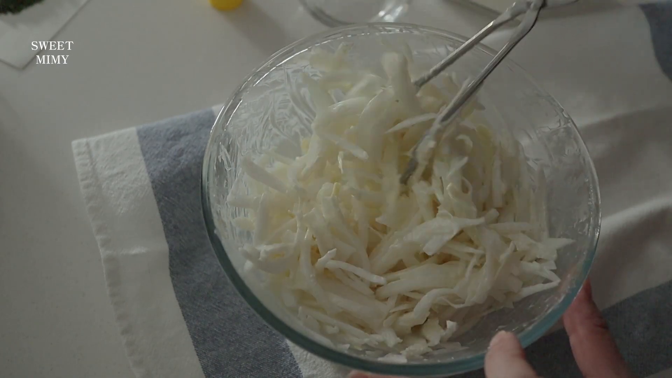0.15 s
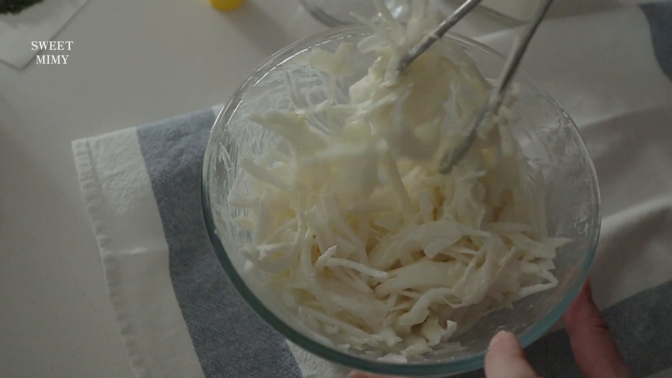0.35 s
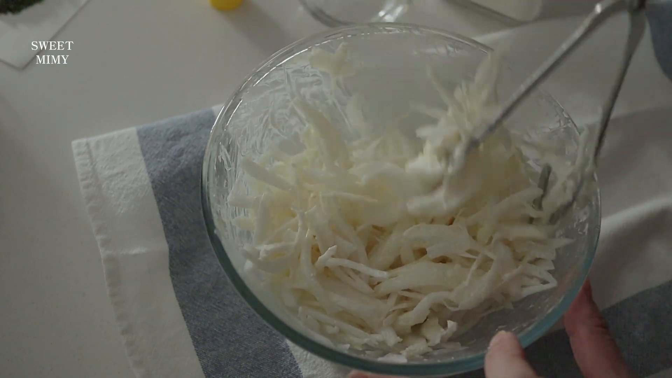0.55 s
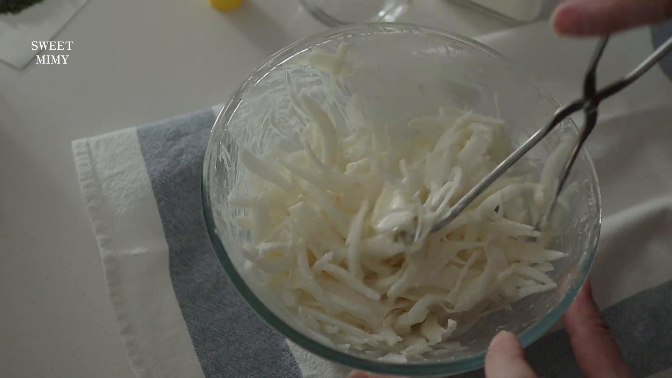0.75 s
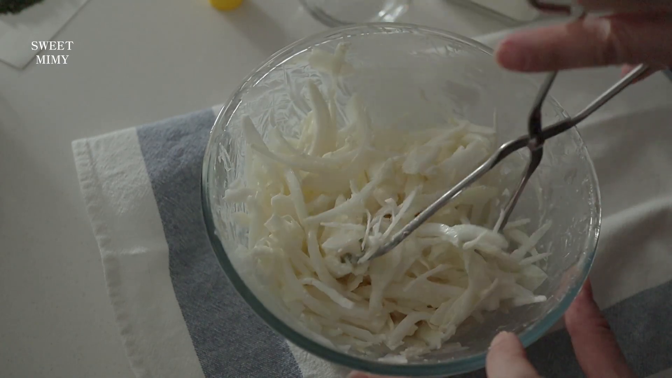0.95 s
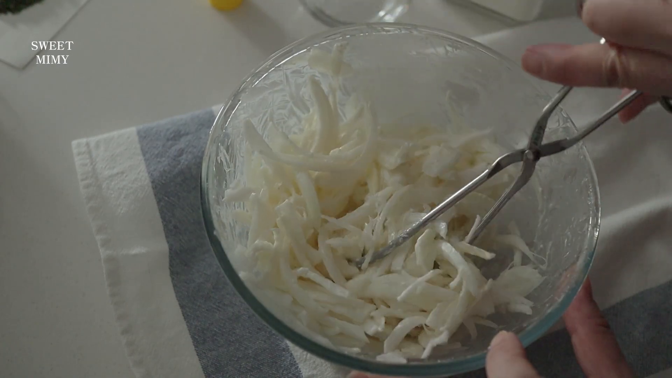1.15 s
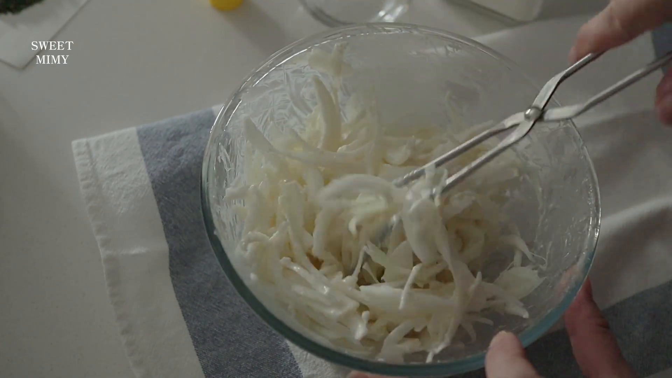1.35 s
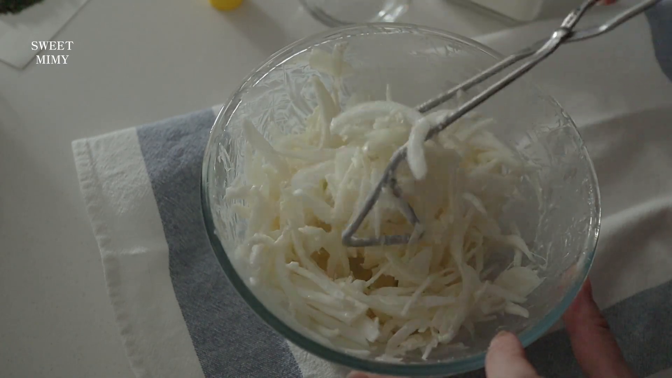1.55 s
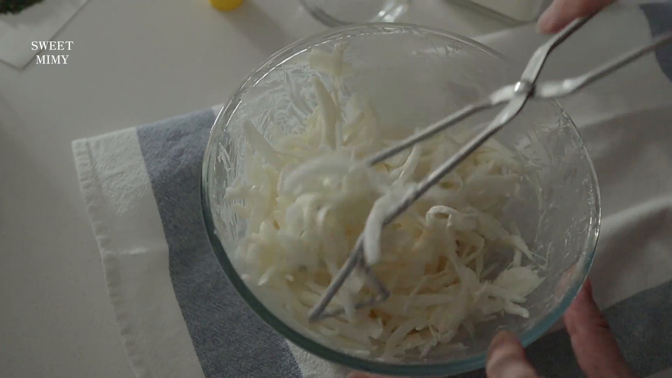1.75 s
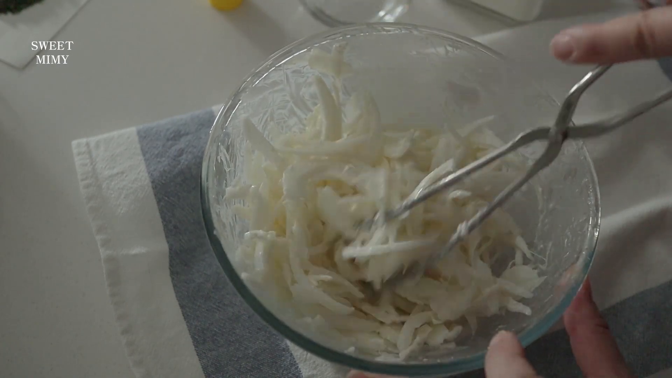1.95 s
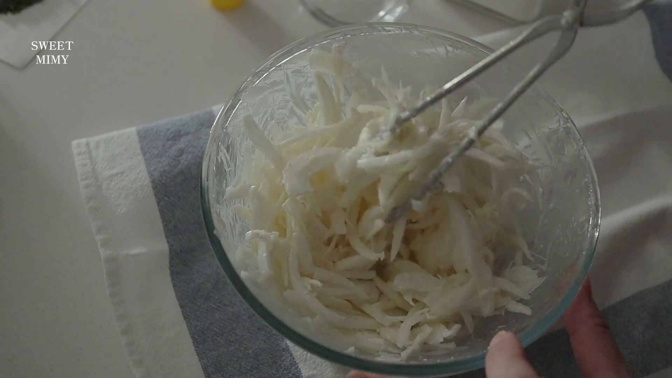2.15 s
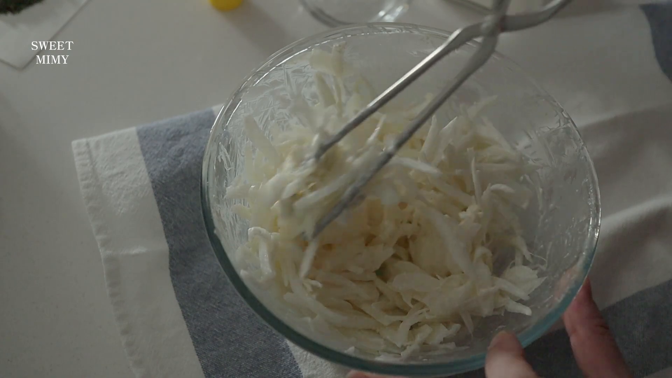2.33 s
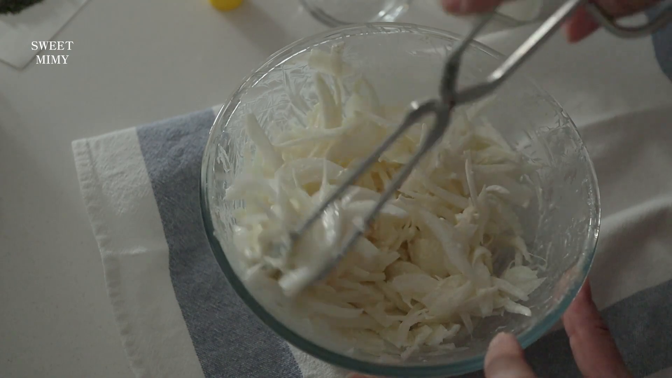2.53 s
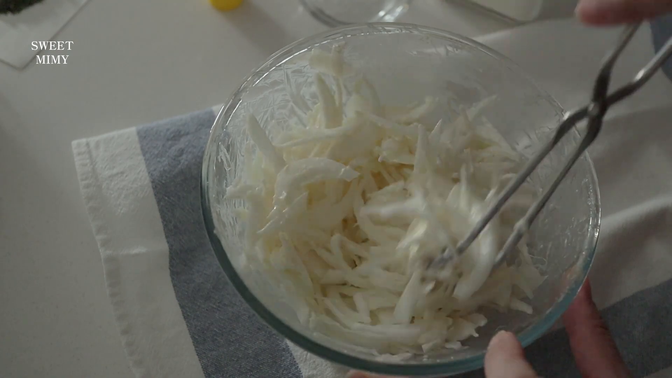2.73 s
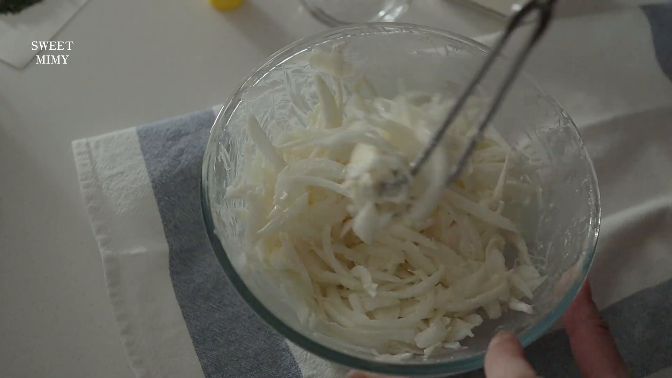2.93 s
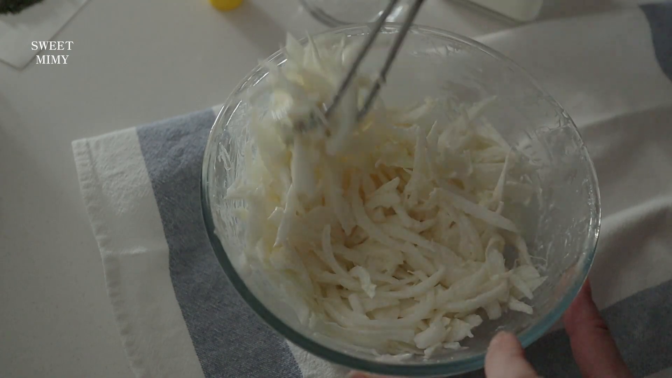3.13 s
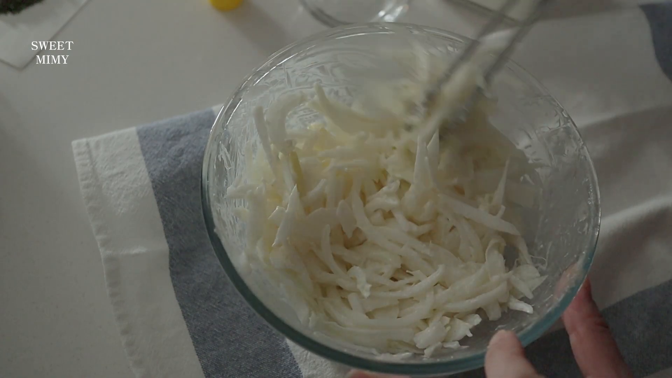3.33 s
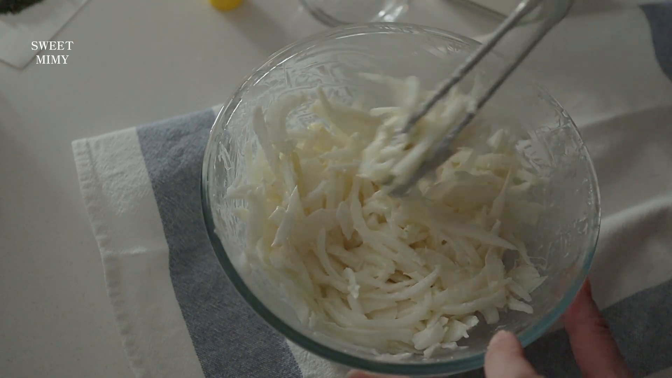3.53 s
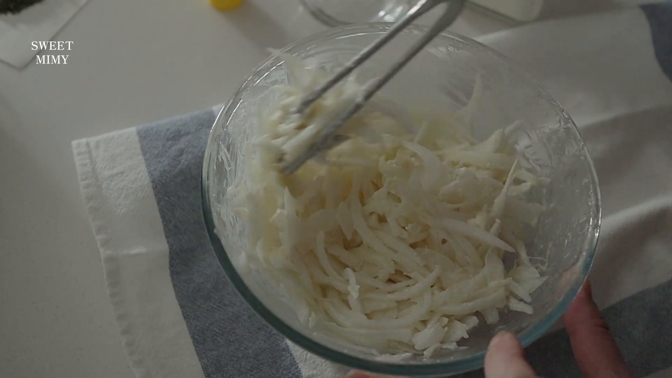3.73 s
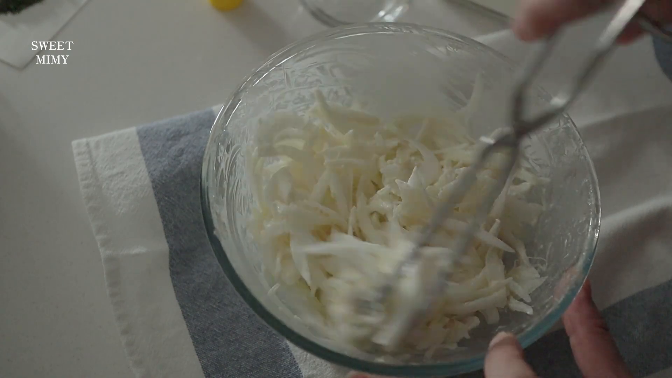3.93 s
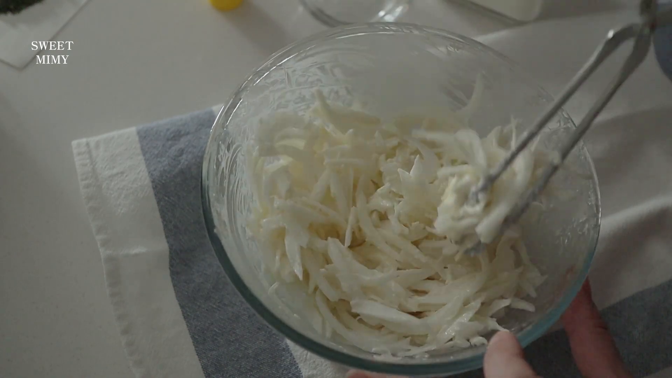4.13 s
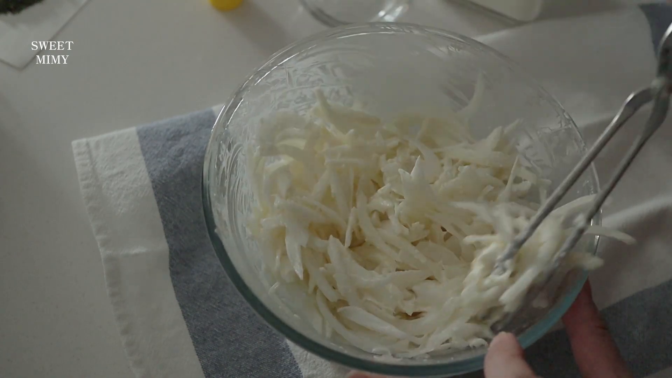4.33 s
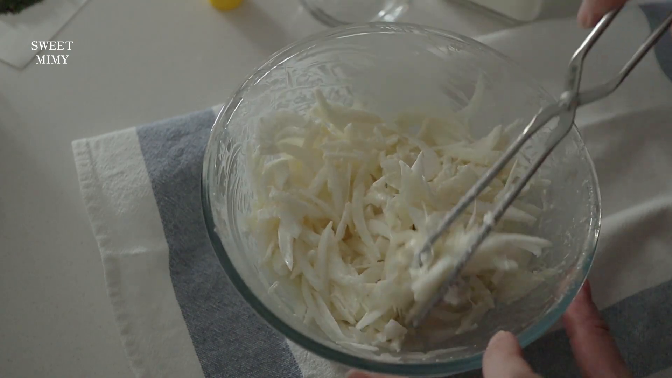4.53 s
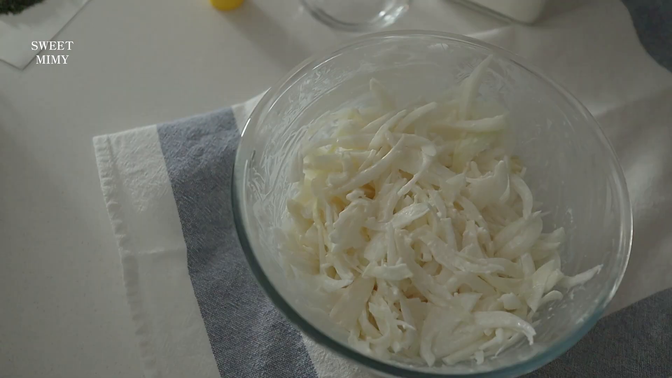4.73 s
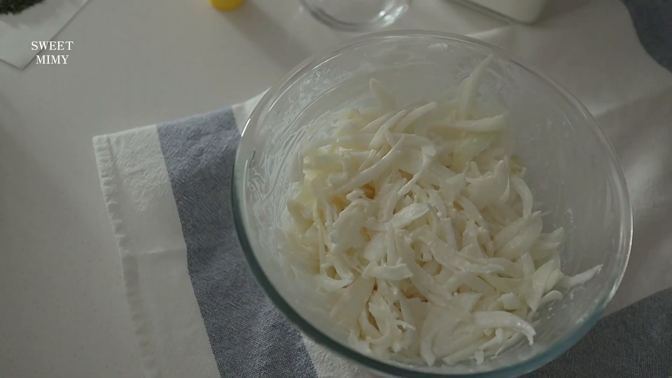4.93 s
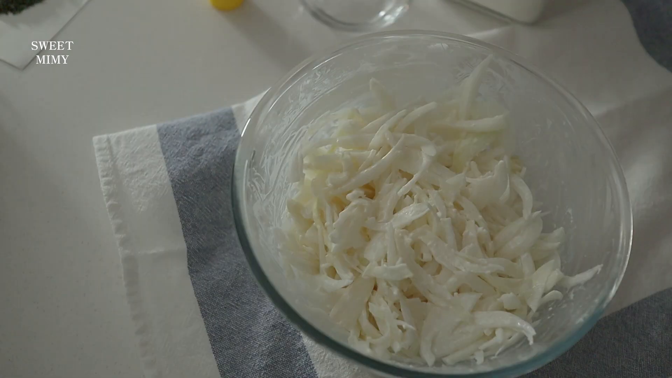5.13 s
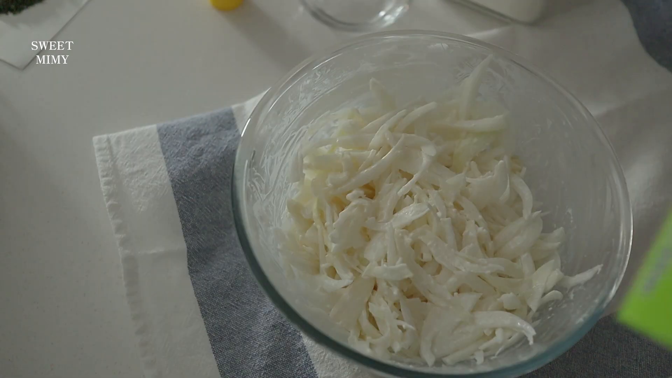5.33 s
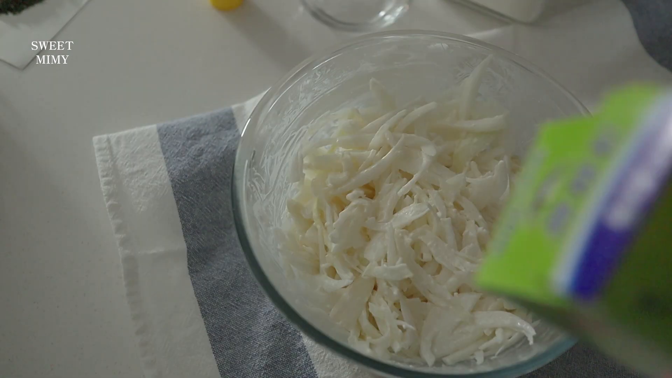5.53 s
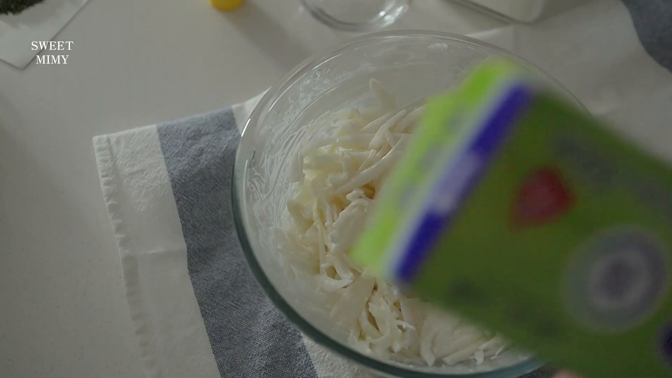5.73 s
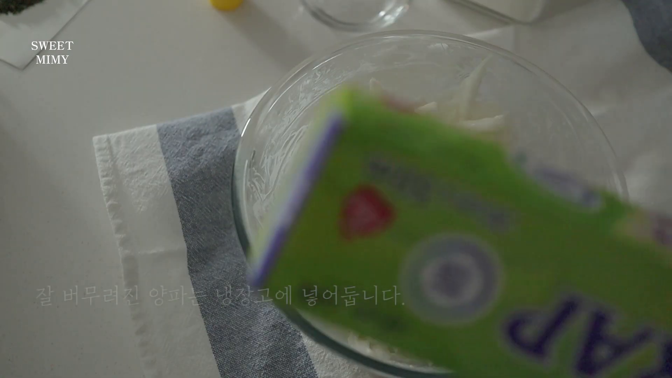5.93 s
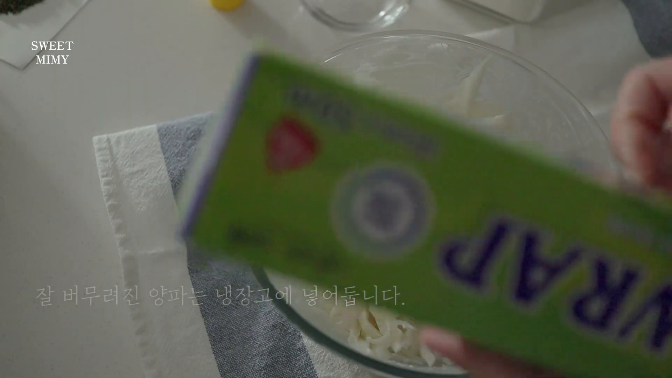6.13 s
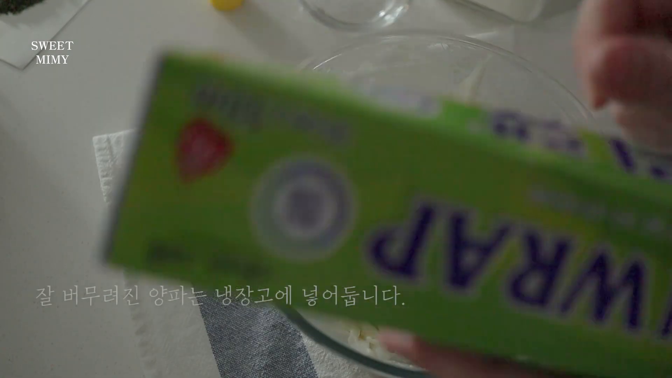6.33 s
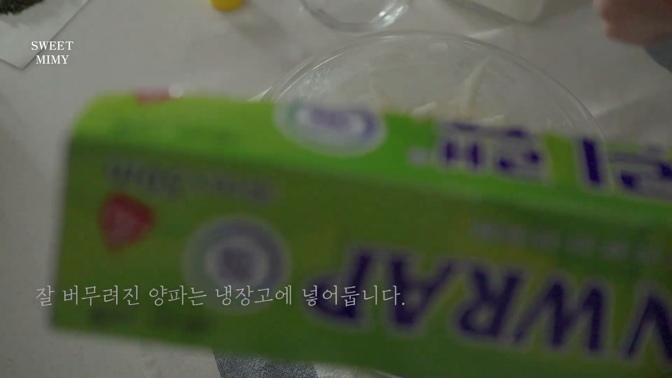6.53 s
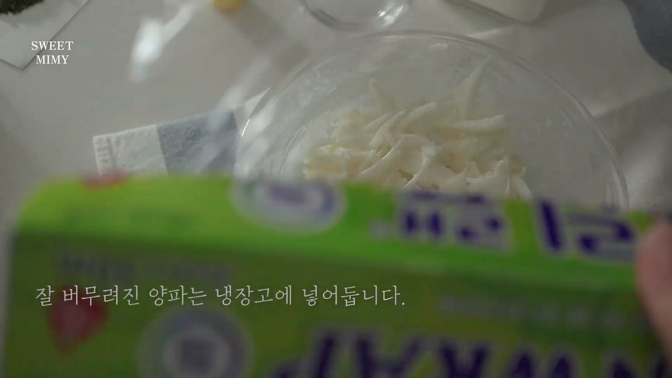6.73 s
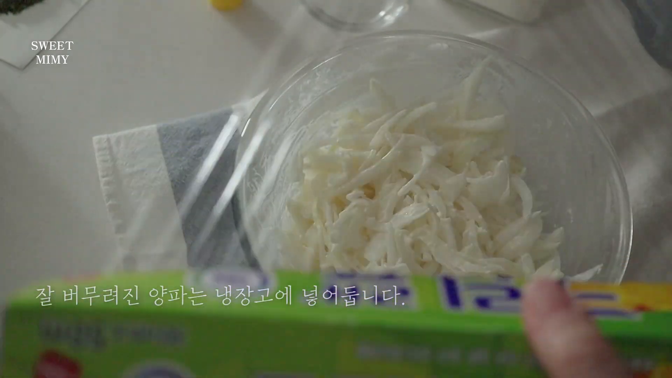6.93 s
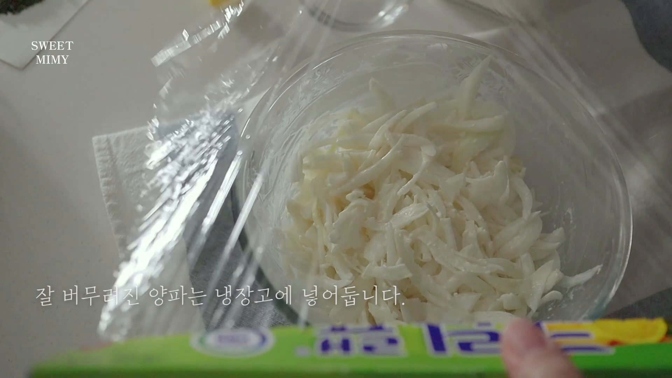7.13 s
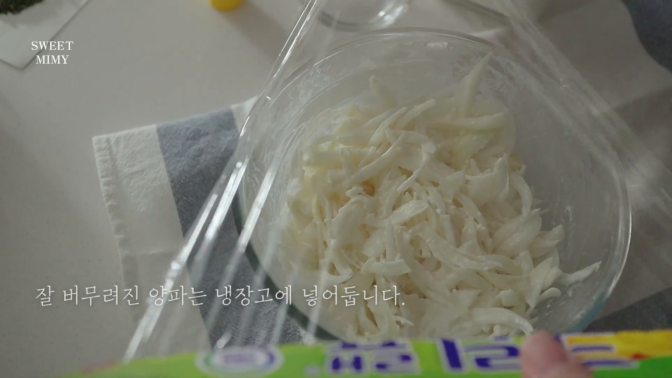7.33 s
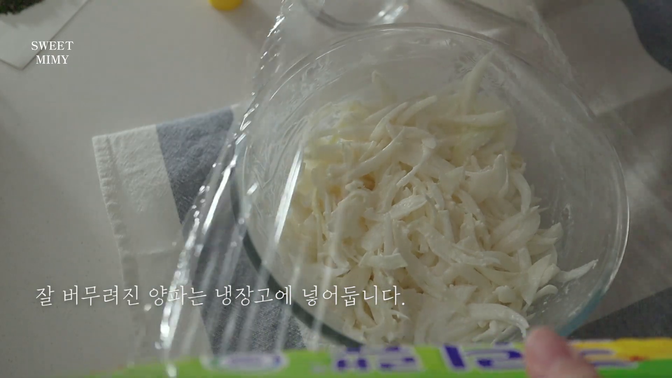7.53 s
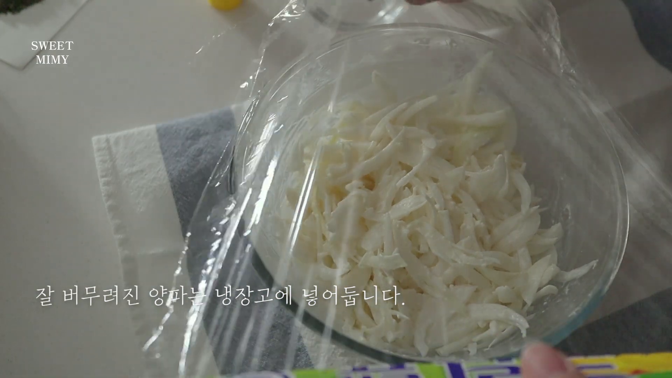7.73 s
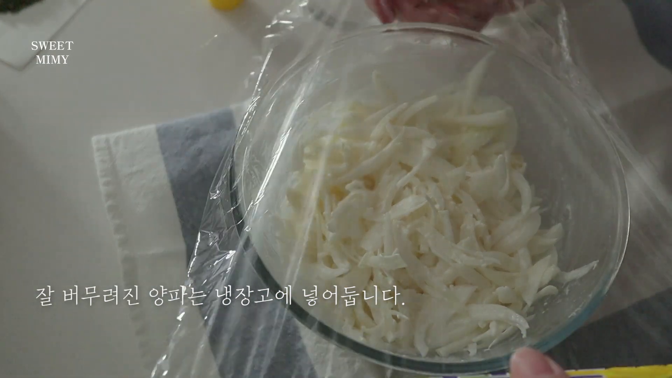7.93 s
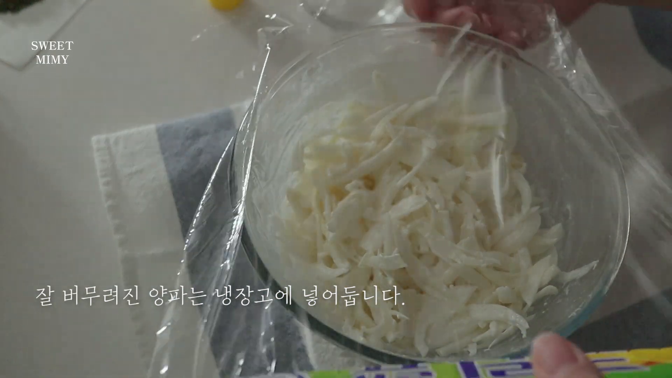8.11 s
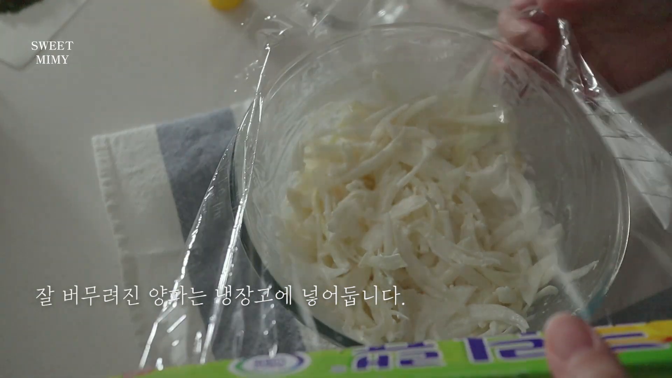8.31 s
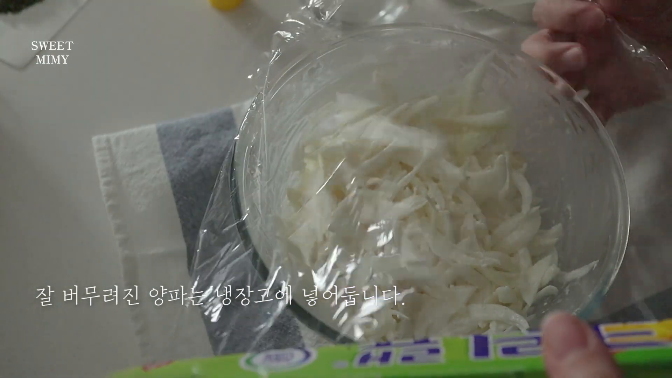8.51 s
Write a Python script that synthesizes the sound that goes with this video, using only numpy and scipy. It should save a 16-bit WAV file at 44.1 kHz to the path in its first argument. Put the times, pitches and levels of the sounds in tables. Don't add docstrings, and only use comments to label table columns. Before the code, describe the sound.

Close microphone in a quiet kitchen. Metal tongs toss wet onion slices with faint rustle, striking a glass bowl in several sharp, short-ringing knocks with gritty scrapes. After a last clear clink, a cardboard box is bumped and scuffed, then film pulls off its roll in a loud rip and crackles loosely over the bowl.

```python
import sys
import numpy as np
from scipy import signal
from scipy.fft import rfft, irfft, next_fast_len
from scipy.io import wavfile

SR = 44100
rng = np.random.default_rng(int(sys.argv[2]) if len(sys.argv) > 2 else 0)


def makeup_ratio(level_db):
    decades = np.asarray(level_db, float) / 20
    return 10 ** decades


def waveform_to_disk(signal):
    frames = np.transpose(np.atleast_2d(signal))
    scaled = np.clip(frames, -1, 1) * 32767
    samples = np.round(scaled).astype(np.int16)
    wavfile.write(sys.argv[1], SR, samples)


N = 382347
TIME = np.arange(N) / SR


def rms_one(x):
    return x / np.sqrt(np.mean(x ** 2) + 1e-20)


def cut(x, hz, kind):
    return signal.sosfilt(signal.butter(4, hz, kind, fs=SR, output="sos"), x)


def add(out, s, piece):
    i = round(s * SR)
    out[i:i + len(piece)] += piece[:N - i]


def last(rows):
    return np.array(rows)[:, -1]


def sum_db(a_db, b_db):
    return 20 * np.log10(np.hypot(makeup_ratio(a_db), makeup_ratio(b_db)))


def drift(rate):
    r = np.exp(-80 * np.pi * rate / SR)
    slow = signal.lfilter([1], [1, -2 * r, r * r], rng.standard_normal(N // 40 + 2002))[2000:]
    return np.interp(np.arange(N) / 40, np.arange(len(slow)), rms_one(slow))


def swells(rows, shift_db=0):
    s, db, rise, fade = np.transpose(rows)[:4, :, None]
    coarse = TIME[::32]
    late = coarse - s
    rising = 25 * np.log10(np.clip(1 + late / np.maximum(rise, .002), 1e-6, 1))
    fading = -20 * late / np.maximum(fade, .002)
    level = db + np.reshape(shift_db, (-1, 1)) + np.where(late < 0, rising, fading)
    return np.interp(TIME, coarse, 10 * np.log10(np.sum(10 ** (level / 10), axis=0) + 1e-12))


def ring(force, hz, t60):
    r, w = makeup_ratio(-60 / (max(t60, .0003) * SR)), 2 * np.pi * hz / SR
    return signal.lfilter([0, np.sin(w)], [1, -2 * r * np.cos(w), r * r], force + 1e-18)


def grains(per_s, spread_db):
    sizes = makeup_ratio(spread_db * np.minimum(rng.exponential(1, N), 5)) * rng.choice([-1, 1], N)
    return rms_one(sizes * (rng.random(N) < per_s / SR))


def burst(length_s, count):
    force = np.zeros(SR // 2)
    force[0] = 1
    force[(rng.uniform(.1, 1, count) * length_s * SR).astype(int) + 1] = rng.normal(0, 0.49, count)
    return force


def coloured(x, spectrum):
    hz, db = np.transpose(spectrum)
    size = next_fast_len(N)
    f = np.arange(1, size // 2 + 2) * SR / size
    gain = makeup_ratio(np.interp(np.log(f), np.log(hz), db, left=-90, right=-90))
    return rms_one(irfft(rfft(x, size) * gain, size)[:N])


def clicks(events, cycles):
    out = np.zeros(N)
    for s, db, hz in events:
        crack = ring(burst(0.0013, count=5)[:2000], hz, cycles / hz)
        add(out, s, makeup_ratio(db + .7) * crack / np.max(np.abs(crack)))
    return out


# (frequency [Hz], density [dB per Hz])
AIR = [(100, -6), (160, 4), (250, -3.5), (400, 0.5), (630, -10), (1000, -11), (1600, -16.5), (2500, -17.5),
       (8000, -20.5), (16300, -21.5)]
# (time [s], level [dB])
JOLTS = [
    (0, -49),
    (.8, -46),
    (2.59, -44),
    (3.31, -43),
    (4.01, -47),
    (4.43, -33),
    (5.44, -27),
    (5.66, -30),
    (6.2, -35),
    (7.17, -35),
]


def background():
    shake = coloured(rng.standard_normal(N), [(22, -27.5), (35, -2), (55, 0.5), (110, -5), (170, -7.5)])
    rise_s, fade_s = .07, .35
    jolts = makeup_ratio(swells([(s, db, rise_s, fade_s) for s, db in JOLTS]))
    hum = makeup_ratio(np.where(TIME < JOLTS[6][0], -51, -47))
    air = makeup_ratio(-55.5) * coloured(rng.standard_normal(N), AIR)
    return air + makeup_ratio(-2.5) * np.hypot(jolts, hum) * shake


def kitchen(x):
    t60_s, level_db = 0.34, -27
    t = np.arange(SR // 2) / SR
    tail = signal.lfilter([1], [1, -.5], rng.standard_normal(len(t))) * makeup_ratio(-60 * t / t60_s) * (t > .004)
    return makeup_ratio(level_db) * signal.fftconvolve(x, tail / np.sqrt(np.sum(tail ** 2)))[:N]


# (time [s], peak level [dB], frequency [Hz], t60 [s])
BUMPS = [(0.854, -38, 187, 0.068), (3.3, -35, 54.6, .3), (4.411, -20, 107, 0.12), (4.432, -23.5, 55, .2),
         (4.846, -36.5, 361, 0.18), (5.445, -13, 243, 0.13), (5.444, -17.5, 85, 0.22),
         (5.69, -23, 46.6, 0.61), (6.181, -23.5, 101, 0.3), (6.457, 0, 745, 0.032),
         (6.456, -12.5, 306, 0.071), (6.457, -2, 1950, 0.011), (7.159, -13, 305, 0.026),
         (6.688, -26.5, 134, 0.32), (4.028, -39, 45, 0.22), (8.013, -25, 720, 0.09), (8.153, -35, 686, .04),
         (7.325, -16, 740, .025), (5.544, -16, 650, .03), (5.569, -14, 980, .03), (5.587, -14, 1000, .03),
         (5.615, -16, 226, .08), (8.625, -36, 360, .12), (7.455, -28, 720, .04), (6.309, -27, 800, .015)]


def bumps():
    out = np.zeros(N)
    for s, db, hz, t60 in BUMPS:
        add(out, s, makeup_ratio(db) * ring(np.eye(1, SR)[0], hz, t60))
    return out


# (time [s], wet rustle [dB], rise from nothing [s], 20 dB fade [s], dull shuffle re rustle [dB])
STIRS = [
    (0, -49, .1, .4, 0),
    (.92, -51, .12, .9, 3),
    (1.37, -51, .5, .2, -6),
    (2.74, -53, .2, .35, 2),
    (3.39, -62, .3, .3, 9),
    (4.01, -54, .3, .4, -4),
]
# (time [s], thud [dB], rise [s], 20 dB fade [s], hollow knock re thud [dB])
TUMBLE = [
    (.856, -35, .01, .08, -6),
    (.952, -37, .12, .19, -3),
]
# (frequency [Hz], density [dB per Hz])
SHUFFLE = [(120, -8.5), (200, 2), (400, -8.5), (800, -6.5), (1500, -17.5)]
# (frequency [Hz], density [dB per Hz])
RUSTLE = [(590, -38.5), (1000, -20), (1350, -1.5), (1710, -1), (4470, -5.5), (9060, -8), (16000, -17)]
# (time [s], peak level [dB], frequency [Hz])
TICKS = [
    (0.8632, -32, 7850),
    (1.198, -38, 4330),
    (1.359, -40, 3710),
    (3.907, -32, 9780),
    (.873, -36, 3800),
    (4.479, -38, 5500),
    (4.1465, -39, 8600),
    (4.4136, -36, 3850),
    (4.6478, -39, 3750),
    (4.8324, -35, 3300),
]


def onion():
    tossing = TIME < 4.75
    shuffle = np.hypot(makeup_ratio(swells(STIRS, last(STIRS))), makeup_ratio(-55.5))
    shuffle *= makeup_ratio(1.6 * drift(17)) * coloured(rng.standard_normal(N), SHUFFLE)
    rustle = np.hypot(makeup_ratio(swells(STIRS)), makeup_ratio(-63))
    rustle *= makeup_ratio(1.4 * drift(33)) * coloured(grains(4000, 1.6), RUSTLE)
    lumps = cut(grains(450, 1.6), 1400, "low")
    heap = makeup_ratio(swells(TUMBLE)) * rms_one(ring(lumps, 190, 0.047))
    heap += makeup_ratio(swells(TUMBLE, last(TUMBLE))) * rms_one(ring(lumps, 690, 0.029))
    return tossing * (shuffle + rustle) + heap + clicks(TICKS, cycles=9.5)


OPENED_S = 6.3
# (frequency [Hz], density [dB per Hz])
BOX = [(59, -50), (100, -19.5), (217, 1), (420, -6), (763, -8), (880, -7), (1400, -20), (1820, -25),
       (4000, -60)]
# (frequency [Hz], density [dB per Hz])
ROLL = [(59, -23), (100, -7), (319, 2), (530, -3), (738, 5.5), (930, 1), (1400, -21.5), (1820, -78),
        (3080, -120)]


def hollow_box(slips):
    tube = rms_one(ring(slips, 745, 0.03))
    roll = rms_one(coloured(slips, ROLL) + makeup_ratio(-11.5) * tube)
    return np.where(TIME < OPENED_S, coloured(slips, BOX), roll)


# (frequency [Hz], level [dB], t60 [s])
WALL = [
    (980, -8, .02),
    (1570, -4, .018),
    (2950, -12, .012),
]


def cardboard_wall(slips):
    return sum(makeup_ratio(db) * rms_one(ring(slips, hz, t60)) for hz, db, t60 in WALL)


# (frequency [Hz], density [dB per Hz])
PEEL = [(530, -47), (900, -8.5), (1080, -4), (1290, 3), (1460, 1.5), (2410, 0), (3030, -3), (3700, -2.5),
        (6000, -14.5), (7800, -21), (13200, -120)]
# (frequency [Hz], density [dB per Hz])
SLACK = [(530, -40), (900, -3), (1300, -1), (1900, -3.5), (2470, -3), (3700, -5.5), (5560, -10),
         (6470, -18), (8000, -23), (13200, -120)]
# (time [s], level [dB], rise [s], 20 dB fade [s], frequency [Hz])
TAUT = [
    (6.98, -10, .25, .3, 2330),
    (7.25, -9, .25, .5, 2620),
    (7.45, -13, .15, .8, 2420),
]


def film_sheet(slips, folds):
    slack = np.clip((TIME - 7.04) / .08 + .5, 0, 1)
    sheet = np.sqrt(1 - slack) * coloured(slips + 0.9 * folds, PEEL)
    sheet += np.sqrt(slack) * coloured(folds - .5 * slips, SLACK)
    for row in TAUT:
        sheet += makeup_ratio(swells([row])) * rms_one(ring(slips, row[-1], 0.02))
    return sheet


# (time [s], peak level [dB], frequency [Hz], dull part [dB])
SNAPS = [(5.5473, -25, 5130, -25), (6.0721, -28, 5420, -26), (6.2077, -16, 5130, -23),
         (6.3086, -38, 5480, -30), (6.338, -25, 10700, -37), (6.421, -17, 7810, -20),
         (6.4505, -13, 7950, -17), (6.456, -3, 8500, -10), (6.4845, -17, 8170, -32),
         (6.5947, -13, 6090, -19), (7.1904, -17, 5840, -27), (7.3763, -11.5, 8400, -20),
         (7.418, -20, 8420, -27), (7.4497, -13, 5230, -21), (7.4934, -22, 8330, -35),
         (7.5194, -19, 8710, -37), (8.0318, -21, 8940, -30), (8.0853, -21, 8610, -30),
         (8.1617, -22.5, 9000, -28), (8.2602, -25, 8970, -44), (8.3554, -20, 8340, -22),
         (8.3812, -21, 8310, -19), (8.5061, -16, 7930, -21)]
# (time [s], peak level [dB], frequency [Hz])
SETTLING = [(7.5632, -30, 8280), (7.5847, -29, 9250), (7.5981, -21, 8830), (7.6064, -30, 8520),
            (7.6274, -32, 4040), (7.6494, -32, 5510), (7.674, -25, 8130), (7.6994, -28, 8950),
            (7.7124, -32, 10000), (7.7303, -33, 4760), (7.7494, -29, 10200), (7.7644, -29, 8140),
            (7.7727, -26, 4240), (7.7982, -30, 4180), (7.8064, -34, 5050), (7.8276, -25, 9310),
            (7.8354, -28, 7920), (7.8486, -37, 4280), (7.8486, -26, 9070), (7.8704, -27, 9040),
            (7.8745, -26, 9950), (7.894, -33, 7050), (7.9054, -32, 9140), (7.9104, -32, 5490),
            (7.9149, -26, 4790), (7.9409, -33, 4550), (7.9554, -30, 8890), (7.9608, -27, 10300),
            (7.9684, -33, 8690), (7.9764, -35, 5630), (7.9818, -31, 10100), (7.9974, -27, 7340),
            (8.0132, -21, 9760)]
# (time [s], peak level [dB], frequency [Hz])
CREASES = [(7.0174, -18, 4000), (7.0304, -18, 4790), (7.0724, -23, 5570), (7.1094, -21, 4060),
           (7.1974, -19, 5590), (7.2074, -20, 5580), (7.3254, -18, 5440), (7.4495, -13, 4030),
           (7.4774, -20, 4910), (7.5084, -20, 7830), (7.5264, -25, 8020), (8.0274, -22, 4000),
           (8.0571, -20, 8070), (8.0964, -28, 8050), (8.1174, -34, 5850), (8.1514, -15, 4160),
           (8.1764, -18, 4290), (8.2312, -29, 5610), (8.2901, -30, 8200), (8.307, -28, 5980),
           (8.3409, -32, 7820), (8.3409, -23, 8390), (8.3978, -23, 8900), (8.4517, -24, 4370),
           (8.4766, -19, 4230), (8.5504, -31, 8310), (8.5654, -33, 4240), (8.6074, -27, 4160),
           (8.6214, -32, 4330), (8.6634, -30, 7940)]


def film_snaps():
    snaps = list(SNAPS)
    snaps += [(s, db - 2.2, hz, db - 12) for s, db, hz in list(SETTLING) + list(CREASES)]
    stray_db = -39
    for when, how in rng.random((45, 2)):
        snaps.append((7.2 + 1.15 * when, stray_db + 6 * how, 10500, stray_db - 6 * how))
    bright = clicks([(s, db, hz) for s, db, hz, dull_db in snaps], cycles=5)
    dull = clicks([(s, dull_db, 2700) for s, db, hz, dull_db in snaps], cycles=8.3)
    return cut(bright, 3500, "high") + dull


# (time [s], level [dB], rise [s], 20 dB fade [s], cardboard scuff re box [dB])
LIFTS = [(4.765, -54, .01, .3, -2), (4.87, -47, .05, 1.1, -5), (5.36, -39, .2, .5, -12),
         (5.448, -27, .01, .2, -24), (5.546, -22, .004, .15, -4), (5.6, -22, .05, .18, -5),
         (5.66, -25, .06, .06, -5), (6.19, -38, .02, .15, -8), (6.31, -33, .005, .04, -1),
         (6.465, -26, .02, .05, -8), (7.165, -30, .04, .1, -9)]
# (time [s], level [dB], rise [s], 20 dB fade [s], fine crinkle re peel [dB])
PULLS = [(5.04, -49, .09, .08, 1), (5.32, -54, .1, .3, -1), (5.76, -41, .2, 1.2, 0),
         (6.21, -38, .04, .07, 1), (6.34, -43, .04, .15, 1), (6.43, -29, .055, .3, -2),
         (6.64, -28, .09, .7, 0), (6.83, -23, .3, .52, -5), (7.022, -33, .05, .05, -2),
         (7.08, -35, .02, .1, -2), (7.194, -33, .03, .35, -3), (7.29, -31, .03, .1, 0),
         (7.325, -33, .03, .015, 0), (7.36, -37, .03, .15, 0), (7.378, -36, .004, .04, 0),
         (7.452, -30, .006, .03, -1), (7.47, -39, .05, .3, 0), (7.522, -39, .06, .03, 0),
         (7.6, -47.5, .05, 1.8, 2), (8.016, -36, .006, .1, -1), (8.055, -33, .045, .1, 2),
         (8.095, -38, .03, .015, 0), (8.24, -45, .01, .2, 0), (8.48, -36, .03, .08, 0),
         (8.4, -41, .01, .05, 0), (8.16, -31, .014, .08, -1), (8.355, -38, .025, .16, 0),
         (8.455, -37, .015, .12, -1), (8.505, -35, .05, .06, -2), (8.605, -42, .008, .2, 0)]
# (frequency [Hz], density [dB per Hz])
CRINKLE = [(2650, -39.5), (4500, -9.5), (5510, -3.5), (6470, -9), (9190, 0.5), (10000, -3.5),
           (14900, -12.5), (16100, -20.5)]


def box_and_film():
    film_db, scuff_db = swells(PULLS), swells(LIFTS, last(LIFTS))
    peel_db = sum_db(film_db, scuff_db)
    crinkle_db = sum_db(swells(PULLS, last(PULLS)), scuff_db - 9)
    roll_db = film_db + (TIME > OPENED_S) * (1.5 - .65 * np.clip(film_db + 34, 0, None))
    box_db = sum_db(swells(LIFTS), roll_db)
    clumps = np.clip(-.16 * (peel_db + 24), .3, 2.4) * np.where(TIME < OPENED_S, .6, .75) * drift(51)
    wall_db = scuff_db + .35 * np.minimum(scuff_db + 28, 0)
    slips, folds = grains(8000, 2.7), grains(5000, 2.93)
    out = makeup_ratio(box_db + 0.87 * clumps) * hollow_box(slips)
    out += makeup_ratio(peel_db + 0.77 * clumps) * film_sheet(slips, folds)
    out += makeup_ratio(wall_db + clumps) * cardboard_wall(slips)
    fine_db = crinkle_db - 3.0 + 0.97 * clumps + 1.5 * drift(97)
    out += makeup_ratio(fine_db) * coloured(folds + .6 * slips, CRINKLE)
    return out + film_snaps()


# (time [s], peak level [dB], frequency [Hz], t60
# [s])
PINGS = [(3.386, -15, 4330, .024), (3.401, -16, 4200, .03), (3.411, -19, 4050, .06), (3.4, -26, 7450, .08),
         (3.43, -33, 2480, .07), (3.44, -37, 3900, .17), (1.91, -24, 2800, .06), (1.932, -26, 2870, .07),
         (1.945, -28, 2500, .08), (2.645, -34, 2420, .12), (4.49, -40, 2520, .1), (4.542, -44, 2520, .06),
         (8.231, -36, 2518, .12), (8.231, -40, 3900, .08), (8.231, -33, 1400, .2), (4.453, -34, 3910, .14),
         (3.4, -32, 7450, .3), (1.9, -32, 1375, .3), (.854, -32, 850, .02), (1.005, -46, 3900, .03)]


def pings():
    out = np.zeros(N)
    for s, db, hz, t60 in PINGS:
        tone = ring(ring(burst(.003, count=2), hz, .02), hz, t60)
        add(out, s, makeup_ratio(db) * tone / np.max(np.abs(tone)))
    return out


# (time [s], peak level [dB], hardness [dB per octave])
TOUCHES = [
    (.6, -56, -8),
    (2.682, -38, -10),
    (3.362, -40, -8),
    (3.879, -45, -10),
    (4.026, -42, -10),
    (4.415, -47, -6),
    (8.233, -40, -3),
]
# (frequency [Hz], level [dB], t60 [s])
LOW_MODES = [
    (555, -4, .1),
    (1404, 0, .16),
    (2518, -4, 0.22),
    (3900, -4, 0.092),
]


def soft_touches():
    out = np.zeros(N)
    for s, db, hard_db in TOUCHES:
        soft = burst(.02, count=3)
        for hz, mode_db, t60 in LOW_MODES:
            level_db = db + mode_db + hard_db * max(np.log2(hz / 1378), 0)
            add(out, s, makeup_ratio(level_db) * ring(ring(soft, hz, 0.0067), hz, t60) / 20)
    return out


# (time [s], level [dB], 20 dB fade [s], singing [dB], bare scratch [dB])
SLIDES = [
    (.82, -38, .06, -14, 3),
    (1.901, -22, .08, 1, 3.5),
    (2.602, -25, .085, -1.5, 5),
    (3.265, -24, .25, -4.5, 0),
    (3.405, -18, .042, -3, -12),
    (4.458, -31, .1, -2.5, 5),
    (2.557, -48, .6, -13, 0),
    (2.676, -36, .035, -4, 4),
    (1.658, -56, .26, -8.5, 3),
]
SLIDE_PLACE = [0, 1, 2, 3, 4, 5, 2, 1, 4]
# (frequency [Hz], density [dB per Hz])
GRIT = [(650, -41), (1100, -12.5), (2440, -14), (4170, -2.5), (4760, -9), (5670, -13), (15000, -27.5)]


def tongs_sliding():
    rubbing, grit = np.zeros(N), grains(12000, 2.8)
    bare = coloured(grit, GRIT)
    knocked = np.transpose(KNOCKS)[0]
    for (s, db, fade, sing_db, grit_db), k in zip(SLIDES, SLIDE_PLACE):
        a, b = round(s * SR) - SR // 20, round(s * SR) + SR // 3
        if np.min(np.abs(knocked - s)) < .007:
            gesture = [(s, db, 0, fade), (s, db + 8, 0, .02)]
        else:
            gesture = [(s, db, .024, fade)]
        lifted = min([*knocked[knocked > s], np.inf])
        pressure = (makeup_ratio(swells(gesture)) * (TIME < lifted))[a:b]
        for m, (hz, t60, *place_db) in enumerate(BOWL + BOWL_HIGH):
            force = pressure * grit[1000 * m:][a:b]
            line = makeup_ratio(sing_db - 29.5) * ring(force, hz, min(.5 * t60, .07))
            band = makeup_ratio(-27) * ring(force, hz, .014)
            rubbing[a:b] += makeup_ratio(place_db[k]) * (line + band)
        rubbing[a:b] += makeup_ratio(grit_db - 17.5) * pressure * bare[a:b]
    return cut(rubbing, 1150, "high")


# (frequency [Hz], t60 [s], then level at each of six places struck [dB])
BOWL = [(565, 0.3, -6, -10, -30, -21, -26.5, -25), (1375, 0.28, -7, -3.5, -15, -9, -15, -11),
        (1970, 0.086, -30, -19.5, -5, -12, -9, -73), (2412, 0.083, -5, -4, -2, -1, -12.5, -8),
        (2517, 0.075, 6, -15, 2, -24.5, -5.5, 2), (2625, 0.061, -21, -7, -12.5, -16, -21, -7),
        (2870, 0.068, -27, -3.5, -22.5, -18, -28, -14), (3130, 0.04, -2.5, -11.5, -25, -25.5, -18, -10),
        (3320, 0.23, -32, -22.5, -23.5, -12.5, -6.5, -25), (3580, 0.1, -33, -12.5, -19, -4, -9, -29),
        (2778, .12, -25, -5, -25, -20, -25, -20), (3410, .15, -25, -20, -14, -8, -14, -20),
        (3790, .12, -25, -15, -18, -8, -10, -25), (4085, .1, -15, -4, -6, -12, 0, -24)]
# (frequency [Hz], t60 [s], then level at each of six places struck [dB])
BOWL_HIGH = [ (3964, 0.033, -19, 1, 3.5, -27, -3.5, -4), (4190, 0.066, -10, -8, -22, 2.5, 3, -31),
             (4450, .08, -18, -16, -20, -10, -6, -25), (5690, .2, -14, -18, -22, -6, -20, -20),
             (6600, .1, -18, -15, -20, -20, -25, -14), (5510, 0.047, -1.5, -13.5, 2, -12, -3, -6.5),
             (5570, 0.28, -13.5, -4, -6.5, -3, -4, -20), (7445, 0.075, -0.5, -1, -3.5, -8, -2.5, -26),
             (7845, 0.1, -6, -22, -28.5, -0.5, -23, -11), (8200, 0.062, 2, -26.5, -19.5, -19.5, -39, -11),
             (8900, 0.17, -6, -16, -21.5, -11.5, -18.5, -14),
             (9610, 0.063, -29, -2.5, -8.5, -10.5, -28, -9.5), (10350, 0.1, 1, -31.5, -28, -12, -26, -30),
             (12400, 0.1, -16, -18, -25, -16, -30, -31)]
# (time [s], peak level [dB], first clack [dB], bright crack [dB], thud [dB])
KNOCKS = [
    (0.815, -10, -2.5, -25, -25),
    (1.897, -2, 7, -23, -22),
    (2.598, -4.5, 7, -31.5, -29),
    (3.261, 0, 7.5, -19, -26),
    (3.392, -32, -10, -46, -45),
    (4.454, 3, -18.5, -45.5, -53),
]


def tongs_knocking():
    out, once = np.zeros(N), np.eye(1, SR // 2)[0]
    for k, (s, db, clack_db, crack_db, thud_db) in enumerate(KNOCKS):
        blow = burst(.004, count=5)
        modes = 0
        for m, (hz, t60, *place_db) in enumerate(BOWL + BOWL_HIGH):
            long = makeup_ratio(-19.5) * ring(once, hz, min(0.4 * t60, .15))
            clack = makeup_ratio(clack_db - 13) * ring(burst(.004, count=4), hz, 0.014)
            modes = modes + (-1) ** m * makeup_ratio(place_db[k]) * (long + clack)
        crack = makeup_ratio(crack_db + 9.5) * (ring(blow, 11200, .007) + ring(blow, 13800, .005))
        thud = makeup_ratio(thud_db) * (makeup_ratio(1) * ring(once, 160, 0.031) + makeup_ratio(-4) * ring(once, 800, 0.01))
        add(out, s, makeup_ratio(db) * (modes + crack + thud))
    return out


def scene():
    near = bumps() + onion() + box_and_film()
    near += pings() + soft_touches() + tongs_sliding() + tongs_knocking()
    near = signal.sosfilt(signal.butter(2, 15000, fs=SR, output="sos"), near)
    return (near + kitchen(near) + background())[None]


def roll_off(x):
    return signal.sosfilt(signal.butter(12, 16240, fs=SR, output="sos"), x)


def record(dry):
    mix = np.clip(dry, -1, 1)
    return roll_off(mix)


dry = scene()
out = record(dry)
waveform_to_disk(out)
```